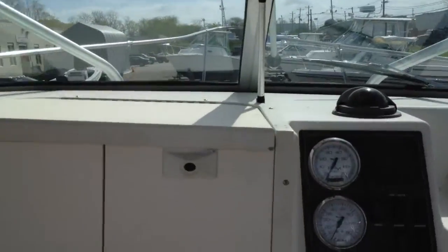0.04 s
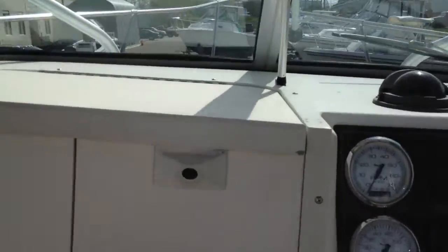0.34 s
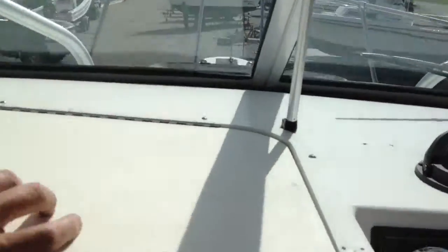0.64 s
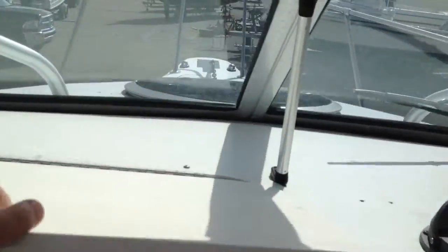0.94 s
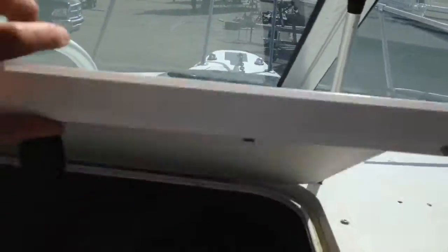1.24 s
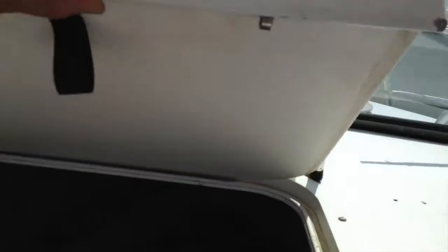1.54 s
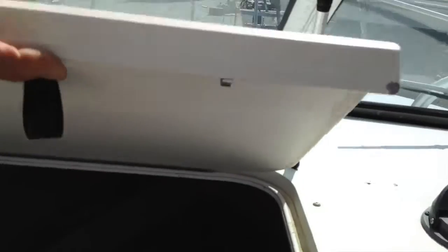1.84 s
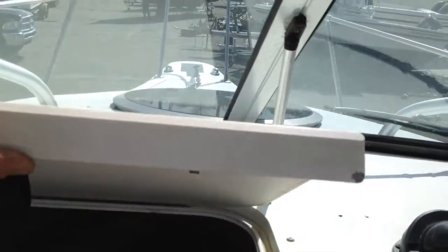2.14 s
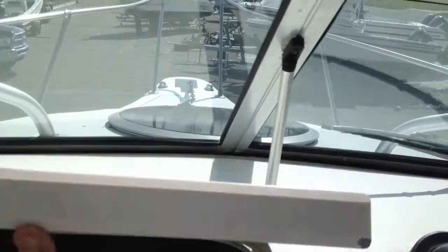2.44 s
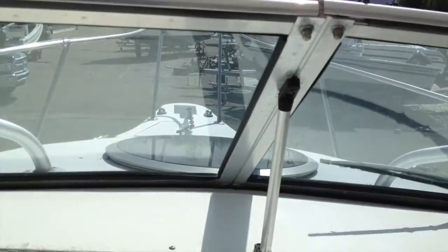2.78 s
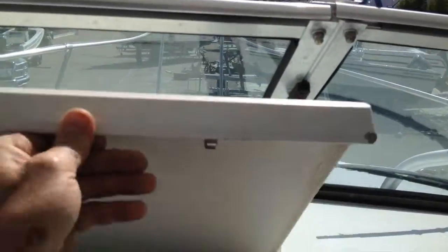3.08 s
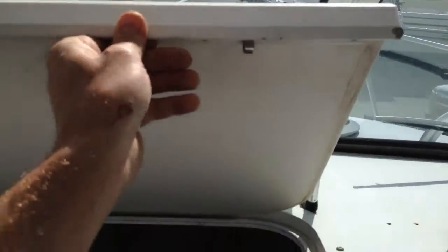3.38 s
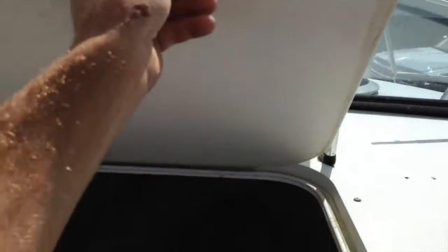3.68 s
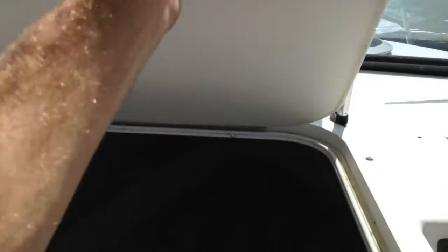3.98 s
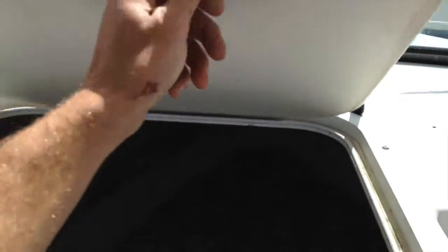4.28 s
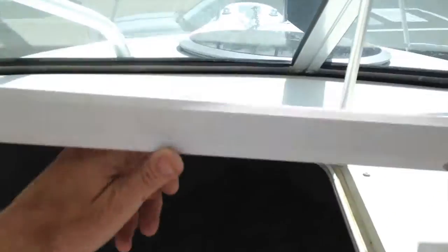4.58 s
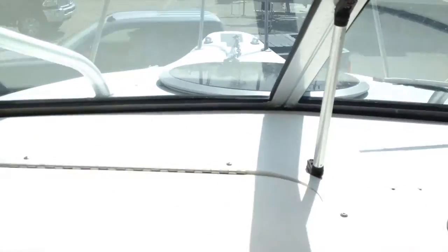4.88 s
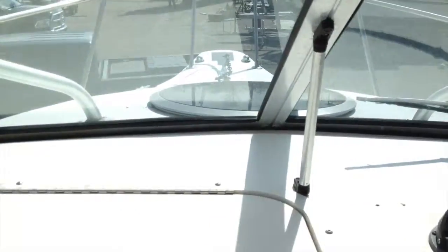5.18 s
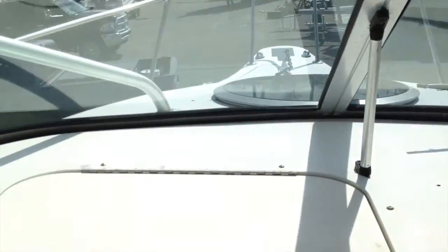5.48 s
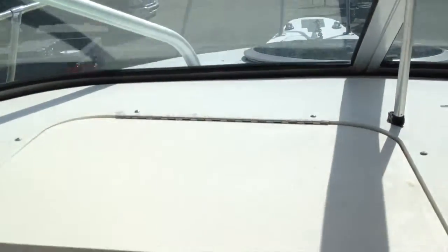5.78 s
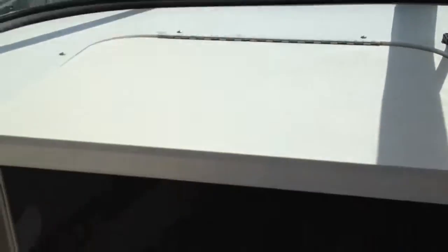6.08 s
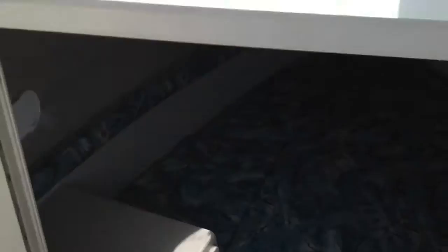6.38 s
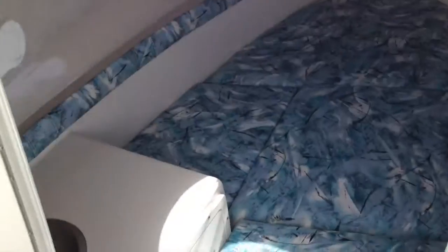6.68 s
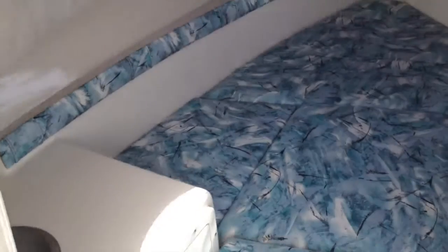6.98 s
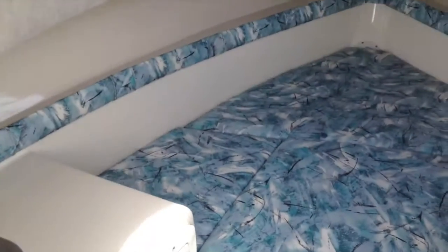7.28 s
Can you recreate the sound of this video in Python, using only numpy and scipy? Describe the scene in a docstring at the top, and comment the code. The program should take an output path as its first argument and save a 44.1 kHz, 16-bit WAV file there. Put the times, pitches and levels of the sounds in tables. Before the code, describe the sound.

Hands bump and click a boat's hatch lid, which slams shut once, with a soft boatyard wash and faint birds behind.

```python
"""A fibreglass boat hatch is gripped, raised, lowered, raised again, dropped shut and lifted once more.
Blows of hand and lid flex the hollow deck and excite its modes; rim, hinge and latch click and ring.
Stick-slip friction makes the squeaks and the rub of palms over the gelcoat.
Behind are the wash of a boatyard and a few birds. An automatic gain control ducks after the slam."""
import sys
import numpy as np
from scipy import signal
from scipy.fft import rfft, irfft
from scipy.io import wavfile
from scipy.ndimage import uniform_filter1d

SR = 44100
rng = np.random.default_rng(int(sys.argv[2]) if len(sys.argv) > 2 else 0)


def log_audio(samples):
    """Write samples as a 16-bit WAV file to the path given in sys.argv[1]."""
    # one column per channel
    frames = np.atleast_2d(samples).T
    # limit to full scale, then quantise
    limited = np.clip(frames, -1, 1)
    pcm = np.round(limited * 32767).astype(np.int16)
    wavfile.write(sys.argv[1], SR, pcm)


N = 327436
TIME = np.arange(N) / SR
SLAM_S = 5.235


def amp(db):
    """Amplitude ratio of a level in decibels."""
    return np.exp(np.asarray(db) * np.log(10) / 20)


def unit_rms(x):
    """Normalisation to a mean power of 1."""
    return x / np.sqrt(np.mean(x ** 2) + 1e-20)


def unit_energy(x):
    """Normalisation to a total energy of 1."""
    return x / np.sqrt(np.sum(x ** 2) + 1e-20)


def curve_at(points, hz):
    """Interpolation on a log-frequency axis."""
    f, value = np.transpose(points)
    return np.interp(np.log(hz + 1), np.log(f + 1), value)


def add(mix, start_s, sound):
    """Superposition: a sound joins the mix at its start time."""
    part = mix[max(round(start_s * SR), 0):][:len(sound)]
    part += sound[:len(part)]


def coloured(x, gain_db, size=2048):
    """Minimum-phase filtering by a gain given as a function of frequency."""
    log_gain = np.log(amp(gain_db(abs(np.fft.fftfreq(size, 1 / SR)))))
    taps = np.fft.ifft(np.exp(np.conj(signal.hilbert(log_gain)))).real
    return signal.fftconvolve(x, taps[:size // 2])[:len(x)]


def patchy_noise(spectrum, patchy_db, size=1024):
    """Random modulation: coloured noise whose level drifts in patches of time and frequency."""
    hz = np.fft.rfftfreq(size, 1 / SR)
    real, imag, patches = rng.standard_normal((3, N // (size // 4) + 5, len(hz)))
    patches = unit_rms(uniform_filter1d(uniform_filter1d(patches, size=16, axis=0), size=4, axis=1))
    frames = (real + 1j * imag) * amp(curve_at(spectrum, hz) + patchy_db * patches)
    return unit_rms(signal.istft(frames.T, nperseg=size, noverlap=size * 3 // 4)[1][:N])


def gesture(onset_s, length_s, level_db, rise_s, release_s):
    """Envelope of a movement: exponential growth up to the onset, a hold, exponential decay."""
    early, late = np.maximum(onset_s - TIME, 0), np.maximum(TIME - onset_s - length_s, 0)
    return amp(level_db) * np.exp(-np.minimum(early / rise_s + late / release_s, 20))


def boatyard(treble_hz=2200):
    """Ambient noise: far traffic and breeze merge into a wash that slowly swells and brightens."""
    # spectrum of the wash: frequency_hz, level_db
    spectrum = [(18, -54.5), (30, -72), (122, -2.5), (167, 1), (190, 0.5), (274, 0.5), (415, -3.5),
                (448, -5), (485, -8), (859, -8), (1110, -9.5), (1870, -18), (3980, -27), (5170, -30.5),
                (15000, -42)]
    # its slow drift: time_s, level_db, treble_lift_db
    drift = [(0, -45.5, 0.5), (.9, -44, 3), (2.1, -43, -1), (3.1, -41, 4), (3.9, -43, 7), (4.6, -41.5, 3.5),
             (5.4, -45, 7.5), (6.1, -43, 5), (6.8, -42.5, 4.5), (7.42, -44.5, -0.5)]
    time_s, level_db, lift_db = np.transpose(drift)
    wash = patchy_noise(spectrum, patchy_db=2.0)
    treble = signal.sosfiltfilt(signal.butter(2, treble_hz, "high", fs=SR, output="sos"), wash)
    lift = amp(np.interp(TIME, time_s, lift_db)) - 1
    return amp(np.interp(TIME, time_s, level_db)) * (wash + treble * lift)


def birds(waver=0.0134, flutter_db=3.0, echo_db=-8):
    """Frequency modulation: near-pure whistles glide and waver, with faint reverberation from the yard."""
    # arched chirps: start_s, length_s, level_db, reference_pitch_hz
    chirps = [(1.836, .074, -47, 5380), (2.343, 0.076, -48, 5210), (5.392, .061, -45.5, 5630),
              (5.477, 0.077, -55, 5350)]
    # the arch flicks up, slides and drops away: length_share, pitch_ratio
    arch = [(0, 0.7), (.2, 0.96), (.72, .86), (1, 0.42)]
    # straight peeps: start_s, length_s, level_db, first_hz, last_hz
    peeps = [(1.95, 0.049, -53, 3100, 5140), (2.475, 0.062, -54, 3490, 3350), (2.491, 0.1, -55, 4400, 4410),
             (4.67, .06, -56, 4680, 5480), (5.677, .05, -40, 3555, 3330), (6.245, 0.038, -51, 3320, 3240)]
    notes = [(s, length, db, np.multiply(arch, [1, hz])) for s, length, db, hz in chirps]
    notes += [(s, length, db, [(0, first), (1, last)]) for s, length, db, first, last in peeps]
    out = np.zeros(N)
    for start_s, length_s, level_db, contour in notes:
        progress = np.linspace(0, 1, round(length_s * SR))
        wobble = unit_rms(uniform_filter1d(rng.standard_normal(SR), size=120))[:len(progress)]
        hz = np.interp(progress, *np.transpose(contour)) * (1 + waver * wobble)
        envelope = amp(level_db + flutter_db * wobble[::-1]) * np.sin(np.pi * progress)
        add(out, start_s, envelope * np.sin(2 * np.pi * np.cumsum(hz) / SR))
    reverb = unit_energy(rng.standard_normal(SR // 2) * np.exp(-TIME[:SR // 2] / 0.047))
    return out + amp(echo_db) * signal.fftconvolve(out, reverb)[:N]


def swing_hiss():
    """Shaped noise: a thin hiss follows the lid as it swings upward."""
    # upward swings: onset_s, length_s, level_db, rise_s
    swings = [(1.597, 0.24, -48.5, 0.0032), (3.093, 0.2, -50, 0.13)]
    # spectrum of the hiss: frequency_hz, level_db
    spectrum = [(500, -4), (2000, -14), (3500, -4), (5100, 3), (5900, -8), (6700, -0.5), (8000, -12),
                (9400, -4.5), (10400, -2.5), (11600, -7), (12700, -9), (13700, -6), (14600, 1.5)]
    envelope = sum(gesture(*swing, release_s=0.028) for swing in swings)
    return envelope * patchy_noise(spectrum, patchy_db=2.5)


def air_rush(noise, peak_db=-40.5, swell_db_per_s=38, fade_db_per_s=134):
    """Displacement: the falling lid drives out a rush of air that swells up to the slam."""
    below_peak_db = np.maximum(swell_db_per_s * (SLAM_S - TIME), fade_db_per_s * (TIME - SLAM_S))
    return amp(peak_db - below_peak_db) * unit_rms(noise)


def grit(ticks_per_s=75, gain_db=7.0, spread_db=7.0, tick_s=0.00046, band_hz=(2500, 10800)):
    """Shot noise: specks of salt and grit catch under the hand in sparse bright ticks."""
    impulses = amp(spread_db * rng.uniform(-1, 1, N)) * (rng.random(N) < ticks_per_s / SR)
    bursts = signal.lfilter([1], [1, -np.exp(-1 / (tick_s * SR))], impulses) * rng.standard_normal(N)
    return amp(gain_db) * signal.sosfilt(signal.butter(1, band_hz, "band", fs=SR, output="sos"), bursts)


def friction(slips_per_s=700, slip_gain=0.41, spread_db=2):
    """Friction noise: returns a rub grainy with tiny slips, and the panel's resonant response to it."""
    # spectrum of the rub: frequency_hz, level_db
    spectrum = [(50, -12), (110, 11), (300, 18), (700, 10.5), (1200, 1), (2500, -1.5), (4000, -2),
                (6500, -2.5), (10000, -3.5), (15000, -6.5)]
    # resonances of the rubbed lid: centre_hz, width_hz
    resonances = [(1850, 1600), (3150, 340), (4000, 310)]
    sizes = amp(spread_db * np.minimum(rng.exponential(size=N), 4)) * rng.choice([-1, 1], N)
    slips = sizes * (rng.random(N) < slips_per_s / SR)
    grains = unit_rms(coloured(slips, lambda f: curve_at(spectrum, f)))
    rub = unit_rms(patchy_noise(spectrum, patchy_db=4.5) + slip_gain * grains)
    panel = sum(signal.lfilter(*signal.iirpeak(hz, hz / width, SR), rub) for hz, width in resonances)
    return rub, unit_rms(panel)


def palms(rub, panel, rise_s=0.029, release_s=0.039, pressure_db=0.84):
    """Sliding friction: each stroke over the gelcoat wavers in level with the uneven pressure."""
    # strokes of skin and rim: onset_s, length_s, level_db, panel_db
    strokes = [(0, 0.14, -53, -13), (0.467, 0.21, -53, -12), (0.762, 0.11, -48, 2), (0.98, 0.016, -37, -13),
               (1.026, .012, -41.5, -3), (1.09, 0.18, -48, -1), (1.472, 0.045, -47, -8),
               (2.29, 0.016, -53.5, 8), (2.645, 0.31, -51, -2), (2.938, 0.41, -53, 11.5),
               (6.365, 0.036, -53, -18), (7.23, 0.18, -54, -22)]
    gritty = rub + grit()
    out = np.zeros(N)
    for *stroke, panel_db in strokes:
        out += gesture(*stroke, rise_s, release_s) * unit_rms(gritty + amp(panel_db) * panel)
    pressure = unit_rms(uniform_filter1d(uniform_filter1d(rng.standard_normal(N), size=600), size=150))
    return out * amp(pressure_db * (pressure + 0.5))


def squeaks(width_hz=86, rise_s=0.0014, release_s=0.0085):
    """Stick-slip excitation: rim and hinge set one narrow resonance singing with a rough edge."""
    # short squeaks: onset_s, length_s, level_db, pitch_hz
    slips = [(1.6, 0.054, -46.5, 2150), (1.434, 0.08, -53.5, 3110), (3.1, 0.011, -44, 2880),
             (2.6, 0.18, -52, 1790)]
    out, drive = np.zeros(N), rng.standard_normal(N)
    for *slip, hz in slips:
        tone = unit_rms(signal.lfilter(*signal.iirpeak(hz, hz / width_hz, SR), drive))
        out += tone * gesture(*slip, rise_s, release_s)
    return out


def ring(modes, length=SR // 10):
    """Free vibration: a struck body sounds as a sum of damped sines, here in random phase."""
    t = TIME[:length]
    hz, level_db, t60_s = np.transpose(modes)[:, :, None]
    turns = hz * t + rng.random(hz.shape)
    return (amp(level_db - 60 * t / t60_s) * np.sin(2 * np.pi * turns)).sum(0)


def latch(open_s=0.74, knock_db=-26.5):
    """Impulse response: the steel catch rings when jolted; the opening latch knocks in its housing."""
    # jolts of the catch: start_s, strength_db
    jolts = [(.677, -27), (1.7821, -30), (4.276, -32.5), (5.231, -24), (5.239, -6.5)]
    # modes of the catch: pitch_hz, level_db, t60_s
    catch_modes = [(3870, 1, 0.019), (3870, 8, 0.012), (4280, 3, .028), (4490, -1, 0.024),
                   (4860, 2.5, 0.017), (5450, -0.5, .015)]
    # modes of the hollow housing: pitch_hz, level_db, t60_s
    housing_modes = [(556, -12, 0.24), (905, 3.5, 0.043), (1710, -5, 0.071)]
    out = np.zeros(N)
    for start_s, strength_db in jolts:
        add(out, start_s, amp(strength_db) * ring(catch_modes) / 2)
    add(out, open_s, amp(knock_db) * ring(housing_modes))
    return out


def hull(modes_db, wash_db, rise_s=0.00073, size=256):
    """Modal and diffuse response: a blow rings the hull, and the cockpit scatters the sound."""
    # modes of lid and hull: pitch_hz, level_db, t60_s
    modes = [(133.6, -1.5, 0.2), (183.7, -2, 0.27), (227.3, -5.5, 0.26), (277, -12.5, 0.23),
             (333, -6.5, 0.26), (380.5, 2, 0.1), (422, -5, 0.25), (447.4, 1.5, 0.24), (550, -6.5, 0.3),
             (741, -11, 0.3), (933, -4.5, 0.31), (1150, -10, 0.14), (1383, -4, 0.16), (1600, 0.5, 0.085),
             (1800, -15, .13), (2004, 8, 0.05), (2620, 6, 0.039), (2840, -3, 0.087), (3690, 7, 0.039),
             (4160, 15, 0.065), (4770, 13, 0.1), (4900, 5, 0.074)]
    # decay of the scattered sound: frequency_hz, t60_s
    decay = [(100, 0.33), (350, 0.23), (1000, 0.19), (4000, 0.15), (12000, 0.12)]
    t = TIME[:SR // 3]
    ringing = ring(modes, len(t))
    hz, age_s, frames = signal.stft(rng.standard_normal(len(t)), SR, nperseg=size)
    fade = amp(-60 * age_s / curve_at(decay, hz)[:, None])
    wash = signal.istft(frames * fade, SR, nperseg=size)[1][:len(t)]
    response = amp(modes_db) * unit_energy(ringing) + amp(wash_db) * unit_energy(wash)
    return response * (1 - np.exp(-t / rise_s))


def clacks(sizzle_hz=6500, firm_s=0.0173, drag_share=0.68):
    """Hard impact: a contact chatters for milliseconds, a broadband force that sets the lid ringing."""
    # contacts of rim, hinge and latch: start_s, level_db, knock_db, knock_edge_hz, sizzle_db, decay_s
    contacts = [(0.427, -3.5, 10, 1700, 2, 0.029), (0.6744, 11, -4, 1300, -1.5, 0.018),
                (0.917, 9, 4.5, 1700, 6.5, 0.0084), (.923, 2, 10, 2600, 0, 0.0075),
                (1.127, -6.5, -5, 1400, 11, 0.011), (1.784, 2.5, 4.5, 1560, -15, 0.0098),
                (1.862, 1.5, 3.5, 1100, -10, 0.022), (2.456, -16, -3, 1400, 9, 0.003),
                (2.785, -4, 12.5, 1400, -5, 0.044), (2.843, 6, -0.5, 3200, -12, 0.009),
                (3.2098, 6, -2.5, 1100, -10, 0.014), (4.047, 4, -19, 1400, -0.5, 0.016),
                (4.254, 0, 4, 1400, -5, 0.021), (4.276, -5, 15.5, 1200, 0, 0.021),
                (4.761, -4.5, -7, 1400, 1, 0.011), (4.84, -11.5, 3.5, 4000, -4, 0.002),
                (5.0531, 0.5, -5, 1400, -26, 0.0085), (5.2298, 17, 1.5, 1400, -3, 0.012),
                (5.2356, 18, 5, 2000, -8, 0.0016), (5.2391, 19.5, 6, 1600, -4, 0.0023),
                (5.242, 16, 10, 1400, -3, 0.003), (5.2543, -1, -10, 1800, -2, 0.0043),
                (5.273, 1, -11, 2000, -3, .004), (6.107, -14.5, 24.5, 1610, 3, 0.02),
                (6.5491, -5.5, 12, 3120, 3, 0.019), (6.721, -10.5, 6.5, 3600, 2, 0.018),
                (6.944, -10, 5, 1400, 6, 0.028)]
    # spectrum common to all contacts: frequency_hz, gain_db
    spectrum = [(60, -23.5), (200, 6.5), (480, 0), (720, -1), (1000, -4.5), (1900, -3), (3100, -6),
                (4100, -6), (5100, -9.5), (6500, -12.5), (9000, -17), (12500, -23.5), (15000, -21)]
    out, t = np.zeros(N), TIME[:SR // 3]
    for start_s, level_db, knock_db, knock_edge_hz, sizzle_db, decay_s in contacts:
        rise_s = max(drag_share * (decay_s - firm_s), 1 / SR)  # a dragging contact builds up gradually
        fade = np.exp(-t / decay_s) * (1 - np.exp(-t / rise_s))
        # a run of tiny taps: scattered in time, even in spectrum
        phase = np.angle(rfft(rng.standard_normal(len(t)) * fade))
        chatter = unit_energy(irfft(np.exp(1j * phase), len(t)) * np.sqrt(fade))
        rung = chatter + signal.fftconvolve(chatter, hull(modes_db=-16.5, wash_db=-6.5))[:len(t)]
        gain_db = lambda f: (curve_at(spectrum, f)
                             + knock_db / (1 + (f / knock_edge_hz) ** 4)
                             + sizzle_db * f ** 6 / (f ** 6 + sizzle_hz ** 6))
        add(out, start_s, amp(level_db) * coloured(rung, gain_db))
    return out


def fumbles(bumps_per_s=22, pitch_hz=177, octaves=0.25, spread_db=2, ring_db=0, cycles=0.51):
    """Irregular impacts: rows of bumps from shifting fingers, uneven in time, strength and pitch."""
    # changes of grip: start_s, length_s, level_db
    grips = [(1.08, 0.15, -33), (1.48, 0.067, -32), (2.55, 0.096, -22.5), (3.23, 0.088, -24),
             (3.74, 0.041, -30), (4.27, 0.059, -22.5), (5, 0.16, -26.5), (5.73, 0.074, -24)]
    rows = []
    for start_s, length_s, level_db in grips:
        count = max(round(length_s * bumps_per_s), 1)
        for k, (jitter, force, spot) in enumerate(rng.uniform(-0.986, 1, size=(20, 3))[:count]):
            time_s = start_s + length_s * (k + .5 + .5 * jitter) / count
            hz = pitch_hz * 2 ** (octaves * spot)
            rows.append((time_s, level_db + spread_db * force, hz, ring_db, cycles))
    return rows


def rebounds(count=10, gap_s=0.019, jitter_s=.002, first_db=-9, fade_db_per_s=91,
             pitch_hz=252, octaves=0.11, ring_db=-4.5, cycles=0.56):
    """Inelastic collisions: rows of ever weaker bumps as the dropped lid shudders on its seal."""
    rows = []
    for k, (jitter, spot) in enumerate(rng.uniform(-1, 1, (count, 2))):
        time_s = SLAM_S + (k + 1) * gap_s + jitter_s * jitter
        level_db = first_db - fade_db_per_s * k * gap_s
        rows.append((time_s, level_db, pitch_hz * 2 ** (octaves * spot), ring_db, cycles))
    return rows


def flex(turns, cycles, rise_share=0.4):
    """Damped oscillation: the panel's swing builds up, then decays over so many cycles."""
    swing = np.exp(-np.logaddexp(-turns / (rise_share * cycles), turns / cycles))
    return np.sin(2 * np.pi * turns) * swing / swing.max()


def bumps(contact_cycles=0.38, lead_s=.02, size=5000):
    """Soft impact: a push flexes the panel, and the brief contact makes the hollow hull boom."""
    # dull blows of hand and lid on the deck: time_s, level_db, pitch_hz, ring_db, decay_cycles
    blows = [(0.147, -30.5, 138, -16, .6), (0.189, -30.5, 185, -5, 0.55), (.436, -13.5, 185, -3, 0.36),
             (.474, -30, 217, 2, 0.84), (.835, -28, 473, 0, 1.3), (.847, -23.5, 312, 0, .8),
             (0.922, -21, 360, -10, 2.7), (.926, -24, 610, -3, 3.3), (.973, -24, 132, 0, 0.8),
             (1.033, -23, 140, -0.5, 0.67), (1.136, -28, 150.2, -10, 0.49), (1.146, -21.5, 134, -9, 0.53),
             (1.794, -30, 260, 2.5, 0.69), (1.867, -18.5, 290, -1.5, 0.83), (1.876, -24, 435, -0.5, 1.1),
             (1.884, -24, 199.7, -13, 1.3), (2.436, -18.5, 190, -5, .65), (2.523, -22.5, 202, -6, 0.53),
             (2.56, -22, 208, 2.5, 0.61), (2.683, -26.5, 460, -2, 1.35), (2.692, -18.5, 284, -1, 0.44),
             (2.822, -26.5, 520, 4, 0.81), (2.849, -21.5, 363, -2.5, 0.57), (2.865, -20.5, 210, -2.5, 1.4),
             (3.056, -17, 195, -22, 0.36), (3.215, -18.5, 414, -7, 2), (3.217, -20.5, 227, -15, 1.5),
             (3.238, -23, 228, -13, 1), (3.311, -21.5, 195, -9, .6), (3.412, -21.5, 168, -3.5, 0.64),
             (3.446, -18.5, 198, -13, 0.75), (4.141, -11, 176, -5, 0.6), (4.201, -17, 163, -20, 0.65),
             (4.261, -24, 324, 6, 0.6), (5.093, -21.5, 169, -4, 0.5), (5.169, -11, 219, -7, 0.35),
             (5.213, -18, 430, -8, 1.2), (5.224, -11, 200, -7, 0.95), (5.235, -11, 260, 1, .6),
             (5.2432, -1, 340, -4, 0.6), (5.252, -8, 452, -14.5, 2.9), (5.256, -16, 173, -3, 0.77),
             (5.298, -4.5, 294, -2.5, 0.45), (5.832, -19, 210, -5.5, .65), (5.857, -20.5, 189, -20, .6),
             (6.19, -20.5, 278, -4, .55), (6.672, -23.5, 278, -1.5, 0.61), (6.957, -30.5, 300, 3, 0.67),
             (6.975, -26, 180, -1, 0.54)]
    out, t = np.zeros(N), TIME[:size] - lead_s
    for time_s, level_db, hz, ring_db, cycles in blows + fumbles() + rebounds():
        push = flex(hz * t, cycles)
        contact = flex(hz * t, contact_cycles)
        boom = unit_energy(signal.fftconvolve(contact, hull(modes_db=-8, wash_db=-2.5)))
        add(out, time_s - lead_s, amp(level_db) * push)
        add(out, time_s - lead_s, amp(level_db + ring_db) * np.linalg.norm(push) * boom)
    return out


def scene(low_cut_hz=68, rush_panel_db=-2):
    """Superposition at one small microphone, which loses the deepest part of the blows."""
    impacts = bumps() + clacks()
    rub, panel = friction()
    movement = palms(rub, panel) + swing_hiss() + air_rush(rub + amp(rush_panel_db) * panel)
    low_cut = signal.butter(2, low_cut_hz, "high", fs=SR, output="sos")
    hatch = signal.sosfiltfilt(low_cut, impacts + movement + squeaks())
    return (hatch + latch() + boatyard() + birds())[None]


def record(dry, threshold_db=-24, recovery_db_per_s=6, slope=0.54, attack_s=0.049,
           ceiling=.88, edge_hz=15400):
    """Compression: the gain ducks after loud blows and creeps back; peaks clip; the band is limited."""
    power_db = 10 * np.log10(abs(uniform_filter1d(dry[0] ** 2, size=900)) + 1e-12)
    recovery_db = TIME * recovery_db_per_s
    held_db = np.maximum.accumulate(power_db + recovery_db) - recovery_db
    over_db = np.maximum(held_db - threshold_db, 0)
    pole = np.exp(-1 / (attack_s * SR))
    duck_db = slope * signal.lfilter([1 - pole], [1, -pole], over_db)
    clipped = np.clip(dry / amp(duck_db), -ceiling, ceiling)
    low_pass = signal.firwin(511, edge_hz, window=("kaiser", 9), fs=SR)
    return signal.oaconvolve(clipped, low_pass[None], "same")


dry = scene()
out = record(dry)
log_audio(out)
```